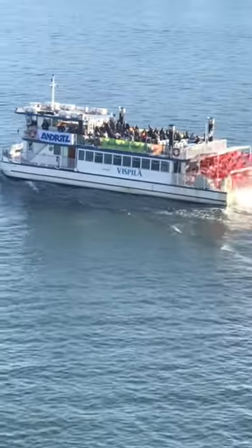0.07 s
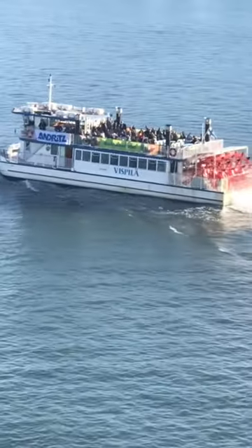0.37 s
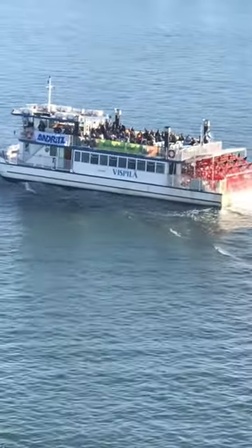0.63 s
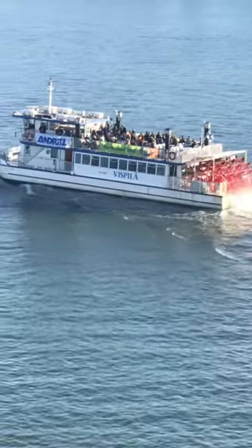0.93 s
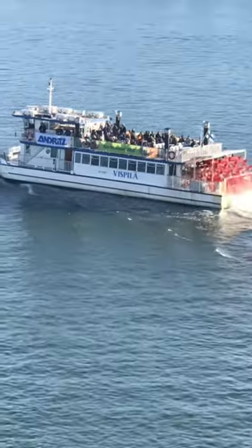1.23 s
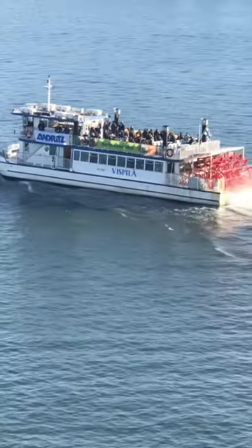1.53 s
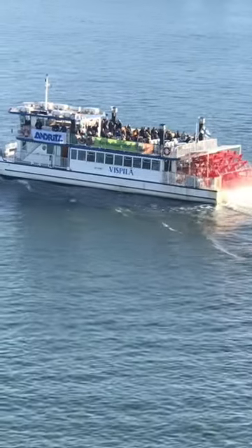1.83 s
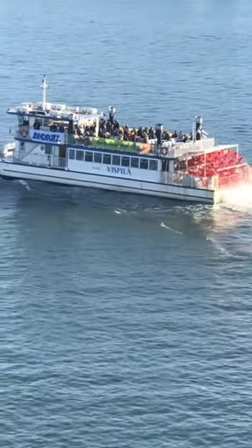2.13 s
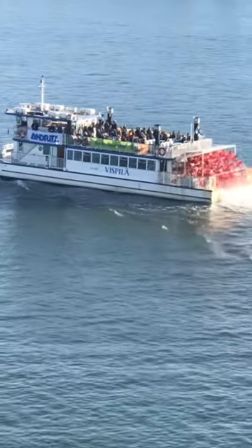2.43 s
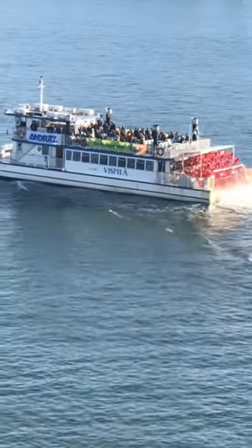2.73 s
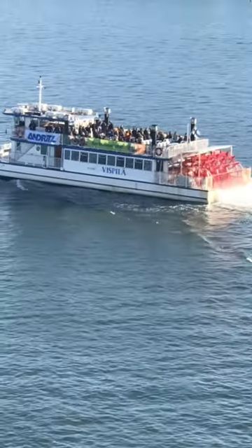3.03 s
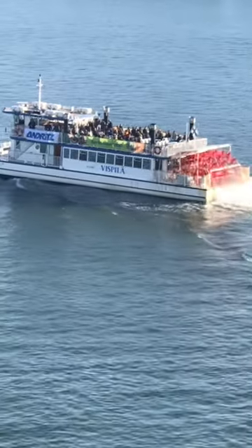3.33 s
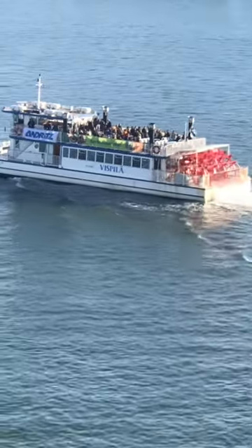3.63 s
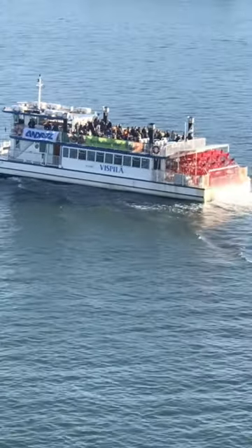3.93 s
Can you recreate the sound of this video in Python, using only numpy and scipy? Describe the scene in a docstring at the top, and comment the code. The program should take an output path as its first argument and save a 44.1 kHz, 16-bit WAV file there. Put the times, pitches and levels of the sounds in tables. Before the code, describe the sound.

Far off on calm water, a passenger boat's engine hums deeply, rising and dipping above a soft throb and steady wake wash. Short wind puffs buffet the microphone in the first half, with tiny nearby ticks and rustles.

```python
"""A passenger boat passes far off on calm water. From the start one engine drones, swelling and fading,
and a second throbs, with a thin machinery whine over the even wash of the wake. At 0.3-0.6 s wind puffs
bump the microphone; then something small ticks faintly close by. Near 1.7 s comes another puff, then
ticks and a first rustle, as the second engine speeds up a little (1.6-2.1 s). Faint rustles follow;
near 3.5 s three more ticks sound and the drone fades deepest before it returns."""
import sys
import numpy as np
from scipy import signal
from scipy.fft import rfft, irfft, next_fast_len
from scipy.io import wavfile
from scipy.ndimage import uniform_filter1d, map_coordinates

SR = 44100
rng = np.random.default_rng(int(sys.argv[2]) if len(sys.argv) > 2 else 0)


def unload_audio(sound):
    """Save the sound as a 16-bit wav file, at the path given as the first command line argument."""
    columns = np.transpose(np.atleast_2d(sound))
    # keep every value between -1 and 1, then stretch to whole-number steps
    steps = np.round(np.clip(columns, -1, 1) * 32767)
    wavfile.write(sys.argv[1], SR, steps.astype(np.int16))


N = 176400

FIRING_HZ, DRONE_DRIFT_CYCLES = 67.08, 0.066
# Steady engine. Each row: time in seconds, level in dB.
DRONE_LEVEL = [(0.0, -31), (0.04, -28), (0.31, -34), (0.36, -43), (0.5, -32.5), (0.92, -28), (1.12, -37),
               (1.37, -28), (1.61, -30), (1.66, -37.5), (1.71, -37), (1.85, -42), (1.99, -36.5),
               (2.09, -44), (2.17, -32.5), (2.32, -31.5), (2.62, -31), (2.76, -37), (2.83, -45.5),
               (3.05, -30.5), (3.42, -32.5), (3.56, -56), (3.65, -50), (3.8, -31.5), (3.97, -30.5),
               (4.0, -27.5)]
# Each row: multiple of the firing rate, relative level in dB.
DRONE_HARMONICS = [(1, 0.5), (2, -18.5), (3, -28)]

SLOW_HZ, FAST_HZ, SHAFT_DRIFT_CYCLES = 33.2, 34.3, .014
# Throbbing engine. Each row: time in seconds, shaft rate in Hz.
SHAFT_SPEED = [(0, 33.2), (1.0, 32.95), (1.6, 33.16), (2.1, 34.41), (3.2, 34.36), (4, 34.3)]
# Each row: multiple of the shaft rate, level in dB when slow, level in dB when fast.
SHAFT_HARMONICS = [(3, -53.5, -53.5), (4, -43, -42), (5, -51.5, -45), (6, -60, -63.5), (7, -55.5, -58.5),
                   (9, -58.5, -59), (11, -62.5, -64)]

# Machinery whine. Each row: time in seconds, pitch in Hz, level in dB.
WHINE_TRACK = [(0, 418, -59), (.8, 418.4, -57.5), (1.15, 419.3, -55), (1.65, 416.6, -58.5),
               (2.1, 417.4, -55.5), (2.55, 418.8, -59), (3.3, 418, -55), (4, 417.4, -53)]
# Faint, blurred steady tones above the whine. Each row: frequency in Hz, level in dB.
FAINT_RESONANCES = [(594, -69.5), (920, -68.5), (1168, -80.5), (1720, -73.5)]

# Wake wash. Each row: time in seconds, level in dB.
WASH_TRACK = [(0, -47.5), (.9, -48.5), (1.5, -50), (1.77, -48.5), (2.1, -50), (2.8, -49.5), (3.5, -49.5),
              (4, -49.9)]
# Wash and rumble of the wake. Each row: frequency in Hz, relative density in dB.
WASH_SPECTRUM = [(280, -31), (480, -4), (597, 1), (764, -3), (1540, -4.5), (1860, -10.5), (2110, -10),
                 (4310, -21.5), (4910, -26), (6110, -28.5), (7710, -37.5), (9590, -41), (10500, -45),
                 (15500, -42)]
RUMBLE_SPECTRUM = [(20, -16.5), (32, -15), (45, -6), (95, -2), (160, -3.5), (240, -8.5), (340, -12),
                   (410, -15), (460, -22), (650, -37.5), (1200, -68)]
WASH_TRIM_DB, RUMBLE_DB = 0.09, -45

# Wind gusts. Each row: centre in seconds, sigma in seconds, top level in dB.
GUST_SWELLS = [(.31, 0.058, -40), (.44, .035, -38.5), (.525, 0.044, -30), (.615, 0.038, -28.5),
               (1.68, 0.077, -35.5), (2.0, 0.089, -48), (3.0, 0.017, -41)]
# Each row: frequency in Hz, relative density in dB.
GUST_SPECTRUM = [(20, -25), (31, -19), (42, 8.5), (70, -1), (150, -11.5), (250, -18), (500, -39),
                 (1500, -83.5)]
# Eddies on the microphone. Each row: start in seconds, envelope peak in dB, initial pitch in Hz.
EDDY_BUMPS = [(.306, -23.5, 116), (.408, -29.5, 118), (.455, -26, 111), (.494, -17, 159.5),
              (0.6, -22.5, 146), (1.645, -27, 149)]
BUMP_RISE_S, BUMP_SAG_PER_S = 0.0058, 17.7

# Ticks. Each row: start in seconds, relative level in dB, ringing share from 0 to 1.
TICK_HITS = [(.6490, -48, .1), (1.2336, -52, .1), (1.7564, -46, 1), (1.775, -59, .9), (3.523, -52, 0.6),
             (3.535, -57, .7), (3.547, -54, 0.3)]
# Each row: frequency in Hz, relative level in dB, T60 in seconds.
RING_MODES = [(1500, 1, .02), (5520, 1, .014), (9700, -7, .015), (11500, -24, .01)]
# Noisy part of a tick. Each row: frequency in Hz, relative density in dB.
CRACK_SPECTRUM = [(1000, -16.5), (4000, -7), (6200, 5.5), (8500, -5), (11000, -23.5)]
CRACK_T60_S = .007

# Rustles. Each row: centre in seconds, sigma in seconds, top level in dB.
RUSTLE_SWELLS = [(1.765, 0.015, -64.5), (2.84, .04, -69.5), (3.2, .06, -68), (3.527, 0.014, -58.5),
                 (3.84, 0.022, -73)]
# Each row: frequency in Hz, relative density in dB.
RUSTLE_SPECTRUM = [(600, -26), (1400, 4.5), (2500, -3.5), (4600, 3.5), (6500, -5), (9500, -10.5),
                   (11000, -20), (16000, -35)]

TOP_HZ = 15750


def amp(db):
    """Decibels to gain."""
    return 10 ** (np.asarray(db) / 20)


def unit(x):
    """Scaled to rms 1."""
    return x / np.sqrt(np.mean(x ** 2) + 1e-20)


def clock():
    """Seconds at each sample."""
    return np.arange(N) / SR


def curves(rows):
    """One value per sample for each column after the time."""
    times_s, *columns = np.transpose(rows)
    return [np.interp(clock(), times_s, column) for column in columns]


def wobble(rate_hz):
    """Smooth random curve, rate_hz knots a second."""
    return map_coordinates(rng.standard_normal(1024), [clock() * rate_hz + 2], mode="wrap")


def filtered(x, response):
    """x filtered by the gain response(hz)."""
    size = next_fast_len(N + SR // 2)
    return irfft(rfft(x, size) * response(np.fft.rfftfreq(size, 1 / SR)), size)[:N]


def noise(spectrum, patchy_db):
    """Coloured noise of rms 1, gain patchy in time and frequency."""
    bins = signal.stft(rng.standard_normal(N), nperseg=512)[2]
    patches = uniform_filter1d(rng.standard_normal(bins.shape), size=5, axis=0)
    patches = uniform_filter1d(patches, size=14, axis=1)
    white = signal.istft(bins * amp(patchy_db * unit(patches)), nperseg=512)[1][:N]
    knots_hz, db = np.transpose(spectrum)
    return unit(filtered(white, lambda hz: amp(np.interp(np.log(hz + 1), np.log(knots_hz + 1), db))))


def tone(hz, drift_cycles, flutter_db, rate_hz):
    """Sine of rms 1; phase and level waver on the way over the water."""
    cycles = np.cumsum(hz * np.ones(N)) / SR + rng.random() + drift_cycles * wobble(rate_hz)
    return unit(amp(flutter_db * wobble(rate_hz)) * np.sin(2 * np.pi * cycles))


def swells(rows):
    """Gaussian swells of gain."""
    return sum(amp(db) * np.exp(-.5 * ((clock() - centre_s) / sigma_s) ** 2)
               for centre_s, sigma_s, db in rows)


def steady_engine():
    """Deep, nearly pure exhaust drone at the firing rate; swells and fades."""
    level_db, = curves(DRONE_LEVEL)
    exhaust = sum(amp(db) * tone(order * FIRING_HZ, DRONE_DRIFT_CYCLES, flutter_db=-2.0, rate_hz=6)
                  for order, db in DRONE_HARMONICS)
    return amp(level_db) * exhaust


def throbbing_engine():
    """Shaft harmonics follow engine speed in pitch and level; higher ones waver more."""
    shaft_hz, = curves(SHAFT_SPEED)
    effort = np.clip((shaft_hz - SLOW_HZ) / (FAST_HZ - SLOW_HZ), 0, 1)
    out = np.zeros(N)
    for order, slow_db, fast_db in SHAFT_HARMONICS:
        harmonic = tone(order * shaft_hz, SHAFT_DRIFT_CYCLES * order, flutter_db=1.8, rate_hz=2 * order)
        out += amp(slow_db + effort * (fast_db - slow_db)) * harmonic
    return out


def whine():
    """One thin machinery tone, a few faint blurred resonances above it."""
    pitch_hz, level_db = curves(WHINE_TRACK)
    resonances = sum(amp(db) * tone(hz, drift_cycles=0.22, flutter_db=6, rate_hz=14)
                     for hz, db in FAINT_RESONANCES)
    return amp(level_db) * tone(pitch_hz, drift_cycles=.035, flutter_db=1.3, rate_hz=11) + resonances


def wake():
    """Churned water: even wash over low rumble."""
    level_db, = curves(WASH_TRACK)
    wash = amp(level_db + WASH_TRIM_DB + 0.42 * wobble(8)) * noise(WASH_SPECTRUM, patchy_db=0.93)
    rumble = noise(RUMBLE_SPECTRUM, patchy_db=2.5) * amp(RUMBLE_DB + wobble(5.5))
    return wash + rumble


def wind():
    """Short gusts buffet the microphone; the hardest eddies land as bumps that sag in pitch."""
    out = swells(GUST_SWELLS) * noise(GUST_SPECTRUM, patchy_db=-2.5)
    for start_s, db, hz in EDDY_BUMPS:
        age_s = np.maximum(clock() - start_s, 0)
        rise = age_s / BUMP_RISE_S
        cycles = hz * (1 - np.exp(-BUMP_SAG_PER_S * age_s)) / BUMP_SAG_PER_S
        out += amp(db) * rise * np.exp(1 - rise) * np.sin(2 * np.pi * cycles)
    return out


def ticks():
    """Tiny hard handling ticks: damped modes blended with a noise crack."""
    hiss = noise(CRACK_SPECTRUM, patchy_db=6)
    out = np.zeros(N)
    for start_s, db, ring_share in TICK_HITS:
        age_s = np.maximum(clock() - start_s, 0)
        ring = sum(amp(mode_db - 60 * age_s / t60_s) * np.sin(2 * np.pi * hz * age_s)
                   for hz, mode_db, t60_s in RING_MODES)
        crack = hiss * (age_s > 0) * amp(-60 * age_s / CRACK_T60_S)
        out += .5 * amp(db) * (ring_share * ring + (1 - ring_share) * crack)
    return out


def rustles():
    """Soft handling near the microphone: brief swells of patchy noise."""
    return swells(RUSTLE_SWELLS) * noise(RUSTLE_SPECTRUM, patchy_db=5.5)


def scene():
    """Boat and wake far off, wind and handling close by; mono."""
    return (steady_engine() + throbbing_engine() + whine() + wake() + wind() + ticks() + rustles())[None]


def record(dry):
    """Brick-wall low-pass at TOP_HZ."""
    return np.array([filtered(channel, lambda hz: hz < TOP_HZ) for channel in dry])


dry = scene()
out = record(dry)
unload_audio(out)
```